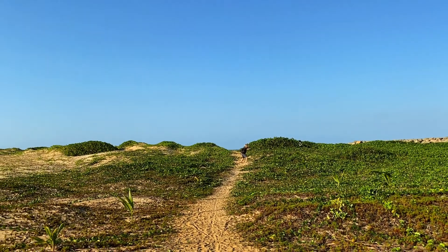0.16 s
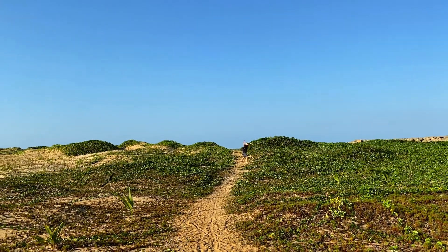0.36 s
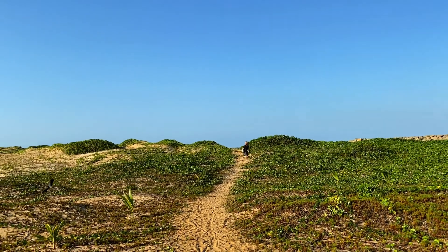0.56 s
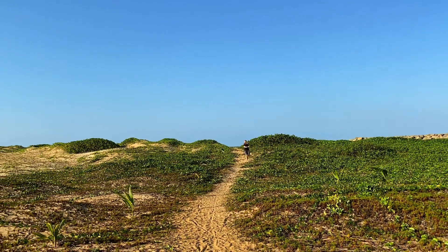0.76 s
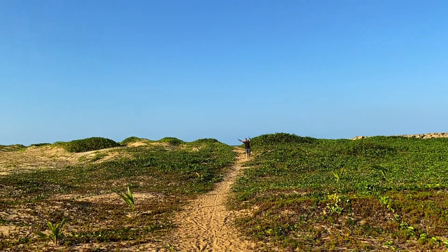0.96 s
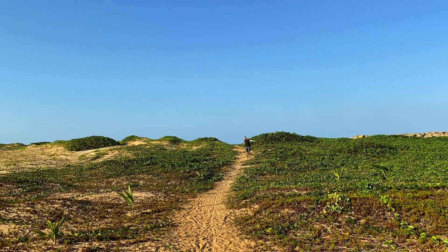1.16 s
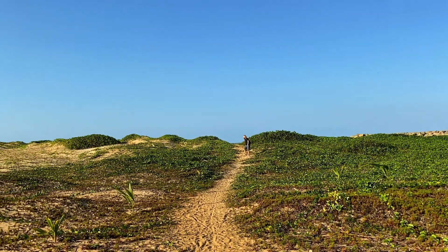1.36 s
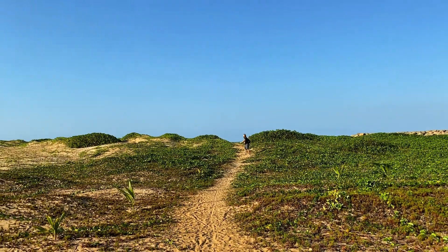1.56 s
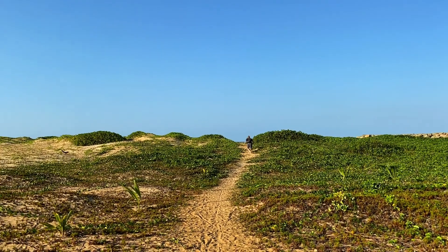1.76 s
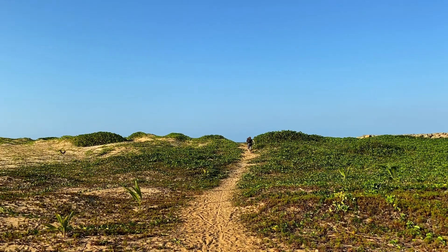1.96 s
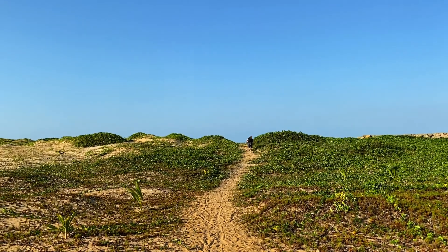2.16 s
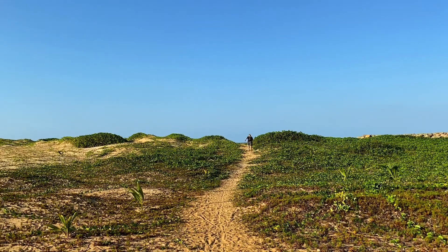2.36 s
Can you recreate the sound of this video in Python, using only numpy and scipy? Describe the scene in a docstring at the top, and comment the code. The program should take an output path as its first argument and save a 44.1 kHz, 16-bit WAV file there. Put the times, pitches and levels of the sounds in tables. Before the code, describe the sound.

Harsh falling bird call close by, faint flock whistles far off, low wind gust growing at the end

```python
"""Alarm cries on a dune path

Close to the microphone a bird gives two clipped notes, one long falling cry and, later, two more cries:
harmonic stacks through a throat resonance, with rasp, echoed by the ground and the slopes.
Far off, a flock of thin bending whistles answers over a low outdoor wash of shaped noise.
Towards the end a gust rises: noise hisses in the low plants and short bursts buffet the microphone."""
import sys
import numpy as np
from scipy import signal
from scipy.fft import rfft, irfft
from scipy.io import wavfile

SR = 44100
rng = np.random.default_rng(int(sys.argv[2]) if len(sys.argv) > 2 else 0)


def store_pcm(level_fs):
    """Save levels as 16-bit WAV."""
    pcm = np.round(np.clip(level_fs, -1, 1) * 32767).astype(np.int16)
    wavfile.write(sys.argv[1], SR, np.atleast_2d(pcm).T)


N = 110250
T, HZ = np.arange(N) / SR, np.fft.rfftfreq(N, 1 / SR)


def amp(db):
    """Decibels to gain."""
    return 10 ** (np.asarray(db) / 20)


def unit(x):
    """Scales to rms 1."""
    return x / np.sqrt(np.mean(x ** 2) + 1e-20)


def colour(points, hz):
    """Reads a spectrum on a log-frequency axis."""
    f, value = np.transpose(points)
    return np.interp(np.log(hz + 1), np.log(f), value)


def level(points):
    """Gain over time from a level curve."""
    return amp(np.interp(T, *np.transpose(points)))


def add(mix, s, sound):
    """Mixes a sound in at time s, cut off at the end."""
    part = mix[max(round(s * SR), 0):][:len(sound)]
    part += sound[:len(part)]


def noise(gain):
    """Noise of rms 1 with the given spectrum."""
    return unit(irfft(rfft(rng.standard_normal(N)) * gain, N))


def bump(x, centre, width):
    """A bell curve."""
    return np.exp(-.5 * ((x - centre) / width) ** 2)


def wander(rate_hz, size):
    """Random drift: straight lines between rate_hz random values a second."""
    knots = np.arange(size) / SR * rate_hz
    return np.interp(knots, np.arange(2048), rng.standard_normal(size=2048))


# colour of the near voice before throat and tilt: f/Hz, level/dB
VOICE_COLOUR = [(500, -17.5), (1100, -12.5), (2100, -8), (3400, -10), (4150, -6), (4650, -6), (5150, -18),
                (5800, -9.5), (7100, -16), (8200, -35.5), (9200, -37), (10400, -22), (11700, -32),
                (13200, -41), (14500, -49.5), (16000, -64.5)]
# colour of its rasp: f/Hz, relative level/dB
RASP_COLOUR = [(200, -28), (550, 17.5), (950, 16.5), (1450, -17), (2200, 0), (3500, 5), (4700, -37),
               (6000, -34), (7300, 5), (8900, -15), (10400, 5.5), (12000, -10), (13200, -19), (14500, -9),
               (16000, -23)]
RASP_DB = -4  # at roughness 1
EDGE_S = 0.00098  # fade at both ends
JITTER, JITTER_HZ = 0.0026, 405.4  # relative pitch drift of a clean voice
SHIMMER_DB, SHIMMER_HZ = 3.24, 111.7  # drift of each overtone's level
THROAT_WIDTH_HZ, SHRILL_HZ, SHRILL_WIDTH_HZ, TILT_FROM_HZ = 424, 10900, 820, 2830


def voice(hz, db, rough, tilt_db, throat_hz, throat_db, shrill_db):
    """A jittering harmonic stack through the throat, with rasp pulsed by each cycle."""
    n = len(hz)
    t = np.arange(n) / SR
    jitter = JITTER * (1 + 4 * rough) * wander(JITTER_HZ * 2, n)
    phase = 2 * np.pi * np.cumsum(hz * (1 + jitter)) / SR

    f = np.arange(1, 17)[:, None] * hz
    throat = throat_db * bump(f, throat_hz, THROAT_WIDTH_HZ)
    shrill = shrill_db * bump(f, SHRILL_HZ, SHRILL_WIDTH_HZ)
    tilt = tilt_db * np.log2(np.maximum(f / TILT_FROM_HZ, 1))
    gains = amp(colour(VOICE_COLOUR, f) + throat + shrill + tilt)

    stack = np.zeros(n)
    for k, gain in enumerate(gains, 1):
        stack += gain * amp(SHIMMER_DB * wander(SHIMMER_HZ * 2, n)) * np.cos(k * phase)
    stack /= np.sqrt((gains ** 2).sum(0) / 2)  # the level stays put when the colour changes
    rasp = noise(amp(colour(RASP_COLOUR, HZ)))[:n] * (1 + .5 * np.cos(phase))
    edges = np.clip(np.minimum(t, t[-1] - t) / EDGE_S, 0, 1)
    return amp(db) * edges * (stack + amp(RASP_DB) * rough * rasp)


# the long cry, close by: t/s, pitch f/Hz, level/dB, roughness (0 = clean), overtone tilt/dB per octave
LONG_CRY = [(0.2417, 1050, -45.5, 0.3, -3), (0.249, 1126, -46, 0.02, 1), (0.27, 1176, -40, 0.15, 0.5),
            (.295, 1157, -43.5, 0.05, 0), (0.313, 1146, -44.5, 0.2, 2.5), (0.318, 1142, -44, 0, 4.5),
            (.342, 1090, -45.5, 0.12, -2), (0.36, 1023, -47.5, 0.23, -5.5), (.393, 909, -55, 0.52, -25.5),
            (.415, 813, -56.5, 0.24, -16), (.422, 782, -66, 1.2, -14), (0.434, 740, -69, 1, -18)]
CRY_THROAT_HZ, CRY_THROAT_DB = 3510, 12.5


def long_cry():
    """The pitch rises a little, then falls, and the voice roughens as it sinks."""
    out = np.zeros(N)
    s, *controls = np.transpose(LONG_CRY)
    t = np.arange(s[0], s[-1], 1 / SR)
    hz, db, rough, tilt_db = [np.interp(t, s, c) for c in controls]
    add(out, s[0], voice(hz, db, rough, tilt_db, CRY_THROAT_HZ, CRY_THROAT_DB, 0))
    return out


# short cries, close by: start t/s, length t/s, top pitch f/Hz, bend/octaves, top level/dB,
# throat resonance f/Hz, its gain/dB, overtone tilt/dB per octave, shrill top/dB, roughness (0 = clean)
SHORT_CRIES = [(0.1076, 0.0089, 999, 0.052, -60.5, 3350, 27.5, -11.5, -25, 0),
               (0.1748, 0.0067, 1032, 0.027, -48.5, 3500, 19.5, 1.5, -3, 0),
               (2.101, .06, 1045, .33, -47, 3060, 8.5, -9.5, 24, 0.1),
               (2.4834, .05, 1216, 0.4, -41, 2320, 9.5, -1, -2, .3)]
TOP_AT, ONSET_DB, END_DB = .3, -12, -12  # the arch: top as a share of the length, ends below the top


def short_cries():
    """Pitch and level share one arch."""
    out = np.zeros(N)
    for start, length, top_hz, bend, db, throat_hz, throat_db, tilt_db, shrill_db, rough in SHORT_CRIES:
        u = np.linspace(0, 1, round(length * SR))
        rise = np.maximum(1 - u / TOP_AT, 0) ** 2
        fall = np.maximum((u - TOP_AT) / (1 - TOP_AT), 0) ** 1.2
        hz = top_hz * 2 ** (-bend * (rise + fall))
        arch_db = db + ONSET_DB * rise + END_DB * fall
        add(out, start, voice(hz, arch_db, rough, tilt_db, throat_hz, throat_db, shrill_db))
    return out


def ground(x):
    """Quick scatter from the nearby sand and plants: fading random taps after 3 ms."""
    decay_s = 0.019
    t = T[:SR // 4]
    taps = rng.standard_normal(len(t)) * np.exp(-t / decay_s) * (t > .003)
    return signal.fftconvolve(x, taps / np.linalg.norm(taps))[:N]


# scatter from the dunes: f/Hz, time to fall 60 dB t/s
DUNE_DECAY = [(300, .4), (1000, 0.84), (3000, 0.37), (5700, 0.53), (8000, .5), (10300, 0.36), (12200, 0.76),
              (14000, 0.17)]


def dunes(x):
    """Diffuse echo from the slopes, each band dying at its own speed."""
    hz, t, z = signal.stft(rng.standard_normal(SR), SR, nperseg=256)
    fade = amp(-60 * t / colour(DUNE_DECAY, hz)[:, None])
    tail = signal.istft(z * fade, SR, nperseg=256)[1]
    return signal.fftconvolve(x, tail / np.linalg.norm(tail))[:N]


# buffets on the microphone: centre t/s, width t/s, level/dB, corner f/Hz
BUFFETS = [(.055, 0.016, -55.5, 110.5), (.085, 0.0072, -62, 400), (0.1128, 0.0019, -63, 845),
           (0.144, 0.017, -55.5, 220), (0.547, 0.029, -64, 360), (.64, 0.026, -51, 126.3),
           (1.97, 0.0066, -36.5, 240), (2.019, 0.0069, -35, 306), (2.053, 0.01, -32, 324),
           (2.157, 0.0064, -40.5, 340), (2.262, 0.0048, -31.5, 226), (2.316, 0.01, -37.5, 410),
           (2.335, 0.01, -31, 165), (2.367, 0.0078, -38, 327), (2.384, 0.013, -44.5, 125),
           (2.432, 0.0046, -32, 426), (2.4601, 0.0046, -24.5, 292), (2.476, 0.0097, -34, 132)]
BUFFET_SLOPE, BASS_CUT_HZ = 3.24, 20.7


def buffets():
    """Single eddies strike the microphone: bell-shaped bursts of low noise."""
    out = np.zeros(N)
    bass_cut = HZ ** 2 / (HZ ** 2 + BASS_CUT_HZ ** 2)
    for centre, width, db, corner_hz in BUFFETS:
        shape = bump(T, centre, width)
        roll_off = np.sqrt(1 + (HZ / corner_hz) ** (2 * BUFFET_SLOPE))
        eddy = noise(bass_cut / roll_off) * shape
        out += amp(db) * eddy * np.linalg.norm(shape) / np.linalg.norm(eddy)
    return out


# wind rumble at the microphone, before a further roll-off near 420 Hz: f/Hz, relative level/dB per Hz
RUMBLE_COLOUR = [(12, -67.5), (20, -33.5), (51, -4), (80, 6.5), (300, -10.5), (357, -13.5), (399, -13),
                 (743, -19), (900, -32), (1170, -44), (1980, -120)]
# its course before the flicker: t/s, level/dB
RUMBLE_LEVEL = [(0, -77.5), (.1, -65), (.22, -73.5), (.39, -62.5), (.48, -85), (.7, -65), (.81, -67),
                (.9, -76), (1.13, -68.5), (1.3, -82.5), (1.43, -63), (1.6, -81), (1.79, -66), (1.84, -52.5),
                (1.94, -44.5), (1.995, -51), (2.1, -46), (2.17, -43), (2.205, -52), (2.24, -44.5),
                (2.295, -49.5), (2.345, -39), (2.41, -42.5), (2.5, -37.5)]


def rumble():
    """Low wind noise whose level is lumpy."""
    low = noise(amp(colour(RUMBLE_COLOUR, HZ)) / (1 + (HZ / 420) ** 3))
    return low * level(RUMBLE_LEVEL) * amp(2 * wander(45, N))


# hiss of the wind in the low plants: f/Hz, relative level/dB per Hz
HISS_COLOUR = [(300, 5), (1200, -0.5), (1700, -6.5), (3000, -8), (4500, -12.5), (5800, -23), (7800, -27),
               (9000, -39), (16000, -69)]
# its course before the flicker: t/s, level/dB
HISS_LEVEL = [(0, -93), (.14, -79), (.18, -69), (.21, -76), (.24, -65), (.45, -75.5), (.75, -70), (1, -82),
              (1.3, -82), (1.792, -87), (1.802, -61.5), (2.01, -61), (2.06, -57), (2.22, -55.5),
              (2.35, -57.5), (2.41, -53), (2.5, -52)]
# faint treble noise above the hiss, from about 2.03 s: f/Hz, relative level/dB per Hz
TREBLE_COLOUR = [(3000, -13), (5500, -2), (7900, 8), (9000, -5.5), (10300, 5), (12300, 1), (13200, -14),
                 (14600, 2), (16000, -10)]
# its course before the flicker: t/s, level/dB
TREBLE_LEVEL = [(1.8, -105), (2.02, -112), (2.04, -81), (2.1, -77), (2.17, -75), (2.25, -83), (2.5, -84.5)]


def hiss_and_treble():
    """Broad wind hiss and a faint treble noise that flicker together."""
    hiss = noise(amp(colour(HISS_COLOUR, HZ))) * level(HISS_LEVEL)
    treble = noise(amp(colour(TREBLE_COLOUR, HZ))) * level(TREBLE_LEVEL)
    return (hiss + treble) * amp(2.3 * wander(70, N))


def whistle(length, start_hz, middle_hz, end_hz):
    """A wavering, nearly pure note of rms 1 that bends through three pitches."""
    u = np.linspace(0, 1, round(length * SR))
    bend = np.polyfit([0, .5, 1], [start_hz, middle_hz, end_hz], 2)
    hz = np.polyval(bend, u) * (1 + 0.009 * wander(300, len(u)))
    swell = abs(np.sin(np.pi * u)) ** 0.23
    flicker = amp(2.8 * wander(120, len(u)))
    return unit(swell * flicker * np.sin(2 * np.pi * np.cumsum(hz) / SR))


# distant whistles: start t/s, length t/s, start f/Hz, middle f/Hz, end f/Hz, level/dB
FAR_WHISTLES = [(.61, 0.12, 1860, 1926, 1828, -68.5), (0.646, 0.088, 2202, 2147, 2046, -63.5),
                (0.714, 0.092, 1880, 1960, 1920, -67), (0.731, 0.11, 2000, 2095, 2130, -76),
                (0.821, .1, 1590, 1553, 1492, -72), (0.852, 0.088, 1680, 1800, 1890, -71),
                (0.935, 0.16, 1910, 1940, 1894, -77.5), (0.974, 0.11, 1620, 1627, 1617, -84),
                (1.106, 0.097, 1890, 1986, 1850, -78), (1.301, .12, 1022, 900, 850, -74.5),
                (1.433, 0.019, 2450, 2490, 2450, -81), (1.823, 0.16, 2750, 2575, 2390, -83),
                (2.034, 0.094, 1318, 1224, 1195, -58.5), (2.039, 0.042, 2130, 2070, 2080, -67.5)]


def far_whistles():
    """The few distant notes that stand out."""
    out = np.zeros(N)
    for start, length, start_hz, middle_hz, end_hz, db in FAR_WHISTLES:
        add(out, start, amp(db) * whistle(length, start_hz, middle_hz, end_hz))
    return out


# chatter of the distant flock: t/s, level/dB
FLOCK_LEVEL = [(.47, -92), (0.539, -70), (.62, -68), (0.702, -66.5), (.84, -64.5), (.89, -70.5),
               (0.949, -85), (1.03, -70), (1.1, -89.5), (1.18, -79), (1.301, -100)]
FLOCK_LOW_HZ, FLOCK_HIGH_HZ, FLOCK_NOTE_S = 1499, 2414, .09  # pitch range at the start
FLOCK_SAG, FLOCK_GLIDE = 0.28, 0.0605  # share of pitch lost by the end; largest bend of one note
RING_HZ, RING_WIDTH_HZ, RING_DB = 5386, 270, -14.5  # shrill overtone, relative to the flock


def flock(count=90):
    """Many overlapping whistles, sinking in pitch, with a shrill noise band above them."""
    out = np.zeros(N)
    first, last = FLOCK_LEVEL[0][0], FLOCK_LEVEL[-1][0]
    for k, (when, pitch, glide) in enumerate(rng.random((count, 3))):
        u = (k + when) / count
        hz = FLOCK_LOW_HZ + pitch * (FLOCK_HIGH_HZ - FLOCK_LOW_HZ)
        hz *= 1 - FLOCK_SAG * u ** 2
        bend = FLOCK_GLIDE * (2 * glide - 1)
        start = first + u * (last - first) - FLOCK_NOTE_S / 2
        add(out, start, whistle(FLOCK_NOTE_S, hz * (1 - bend), hz, hz * (1 + bend)))
    overlap = count * FLOCK_NOTE_S / (last - first)  # notes sounding at once
    ring = noise(bump(HZ, RING_HZ, RING_WIDTH_HZ)) * amp(RING_DB + 2 * wander(40, N))
    return level(FLOCK_LEVEL) * (out / np.sqrt(overlap) + ring)


# a faint high trill far away: t/s, level/dB
TRILL_LEVEL = [(1.3, -110), (1.55, -92.5), (1.78, -92), (1.87, -77), (2, -100)]


def far_trill():
    """A narrow band of high noise, fluttering by its own randomness."""
    return noise(bump(HZ, 4140, 120)) * level(TRILL_LEVEL)


# a faint low drone far away: t/s, level/dB
DRONE_LEVEL = [(0, -88.5), (.85, -84), (1.15, -69), (1.85, -64.5), (2.1, -77)]


def far_drone():
    """A very narrow band of low noise, heard almost as a tone."""
    return noise(bump(HZ, 181.5, 11)) * level(DRONE_LEVEL)


# a soft swell in the middle range: t/s, level/dB
SWELL_LEVEL = [(0, -91.5), (.15, -93), (.3, -60.5), (.5, -78), (.9, -80.5), (1.15, -86), (1.33, -71),
               (1.6, -86.5), (1.8, -68.5), (2.1, -60.5), (2.5, -64.5)]


def middle_swell():
    """A band of noise in the middle range that comes and goes."""
    return noise(bump(HZ, 887, 255)) * level(SWELL_LEVEL)


# low outdoor wash: f/Hz, relative level/dB per Hz
WASH_COLOUR = [(15, -54), (25, -23.5), (64, -8), (193, 0), (297, -6), (359, -5.5), (482, -15.5),
               (684, -21.5), (919, -21), (1450, -24.5), (1950, -28), (3000, -37), (5430, -46.5),
               (5880, -45.5), (15500, -58.5)]
# its course: t/s, level/dB
WASH_LEVEL = [(0, -73.5), (.45, -77.5), (.9, -68), (1.2, -66), (1.55, -64.5), (1.8, -65), (2.5, -60)]


def wash():
    """Steady-coloured, mostly low noise as the bed of the place."""
    return noise(amp(colour(WASH_COLOUR, HZ))) * level(WASH_LEVEL)


def scene():
    """The near bird and its echoes, wind, the far birds and the background."""
    near = long_cry() + short_cries()
    near_echo = amp(-13) * ground(near) + amp(-20) * dunes(near)
    wind = buffets() + rumble() + hiss_and_treble()
    far = far_whistles()
    far_birds = far + amp(-11.5) * dunes(far) + flock()
    background = far_trill() + far_drone() + middle_swell() + wash()
    return (near + near_echo + wind + far_birds + background)[None]


def record(dry):
    """The microphone's bass cut at 45 Hz, then the band limit at 15.7 kHz."""
    bass_cut = signal.butter(6, 45, "high", fs=SR, output="sos")
    thin = signal.sosfilt(bass_cut, dry)
    band_limit = signal.firwin(511, 15700, window=("kaiser", 9), fs=SR)
    return signal.oaconvolve(thin, band_limit[None], "same")


dry = scene()
out = record(dry)
store_pcm(out)
```